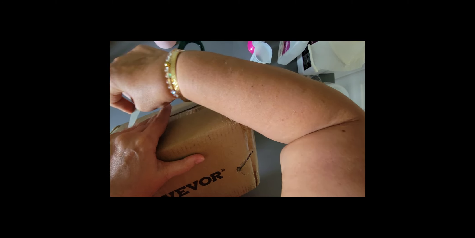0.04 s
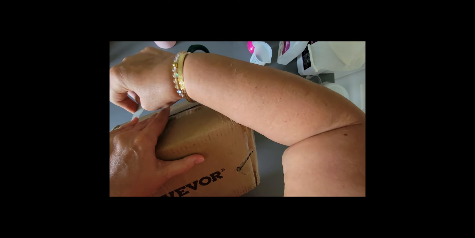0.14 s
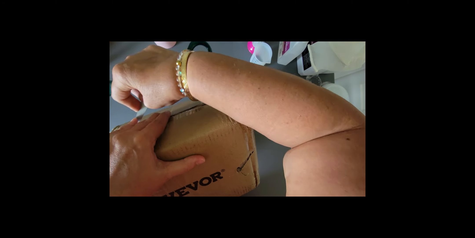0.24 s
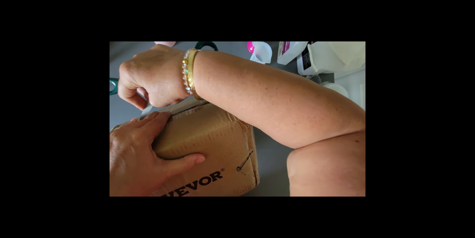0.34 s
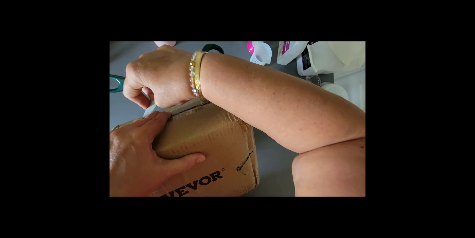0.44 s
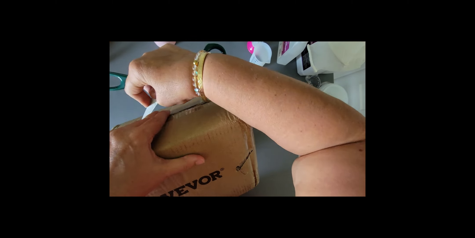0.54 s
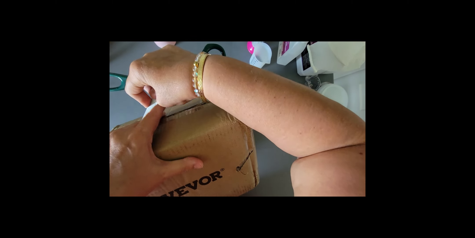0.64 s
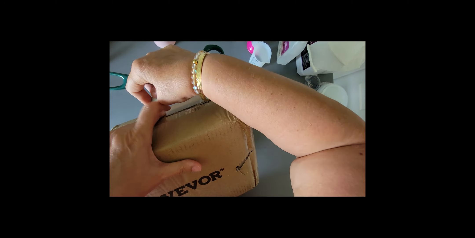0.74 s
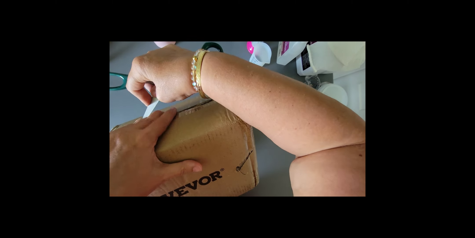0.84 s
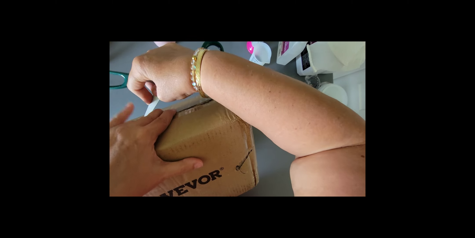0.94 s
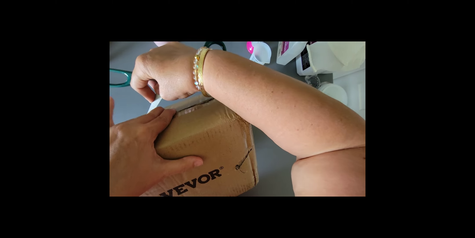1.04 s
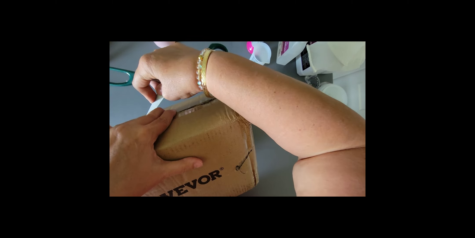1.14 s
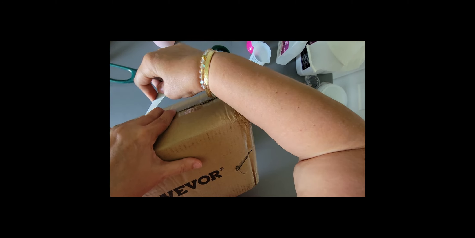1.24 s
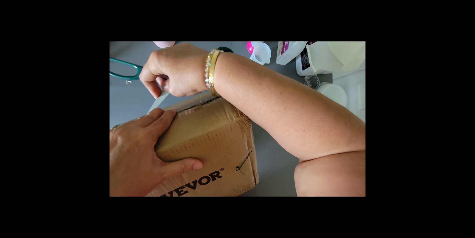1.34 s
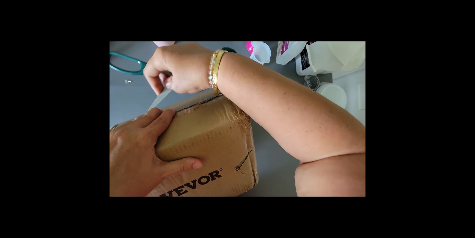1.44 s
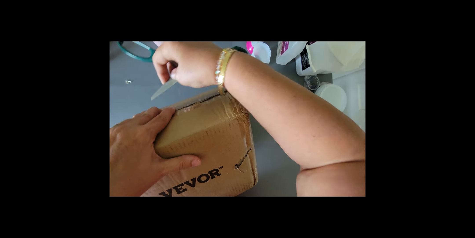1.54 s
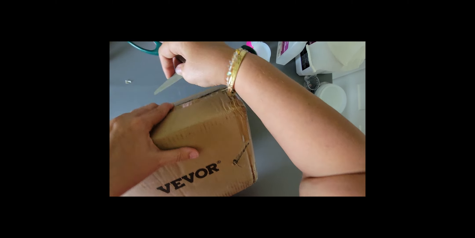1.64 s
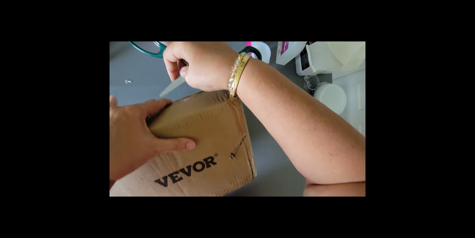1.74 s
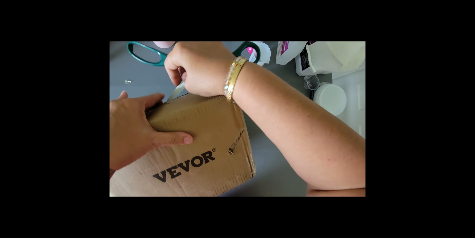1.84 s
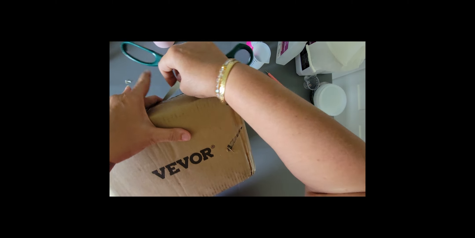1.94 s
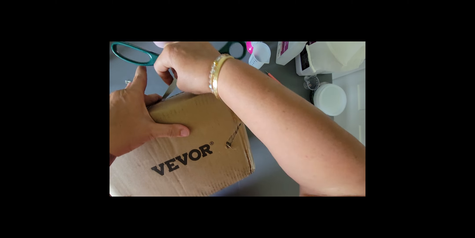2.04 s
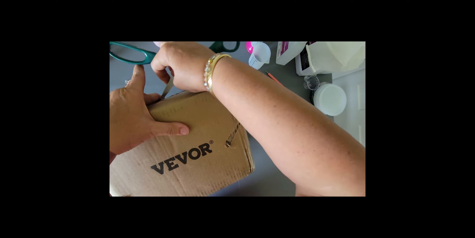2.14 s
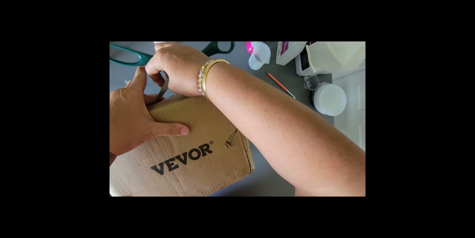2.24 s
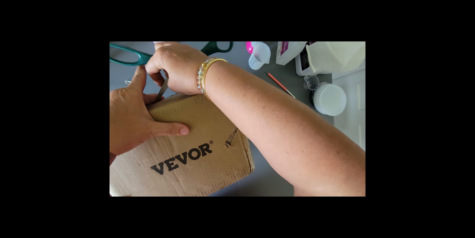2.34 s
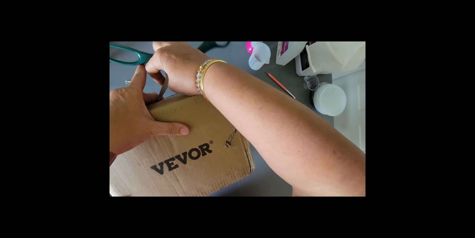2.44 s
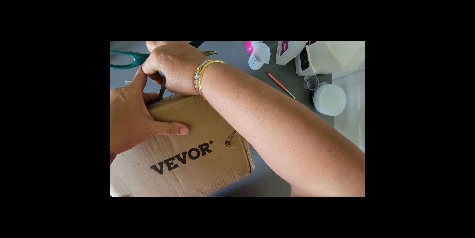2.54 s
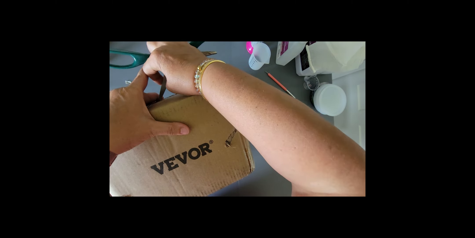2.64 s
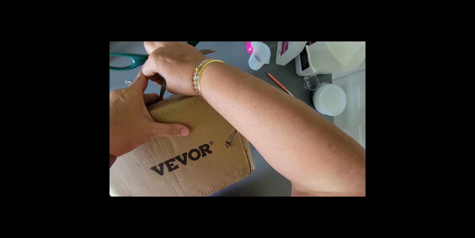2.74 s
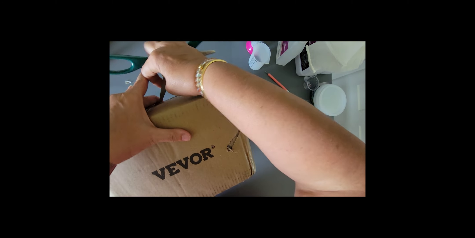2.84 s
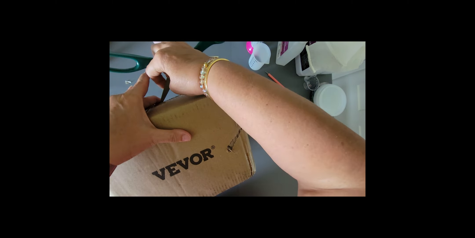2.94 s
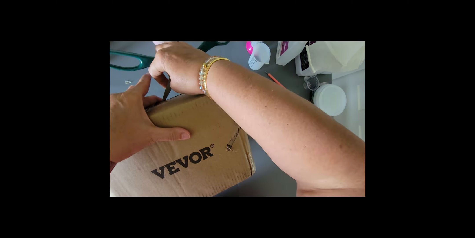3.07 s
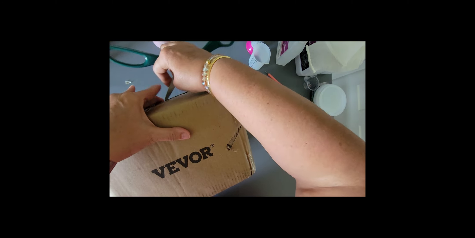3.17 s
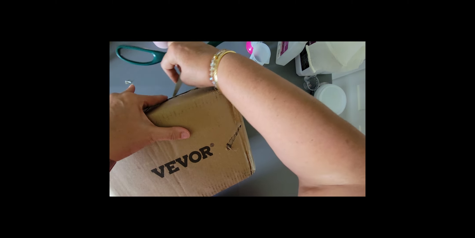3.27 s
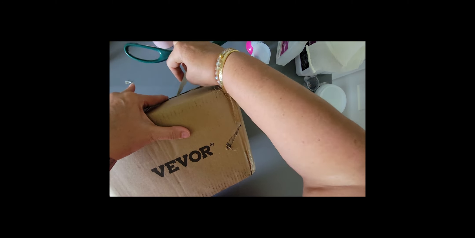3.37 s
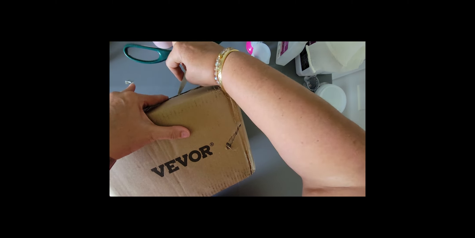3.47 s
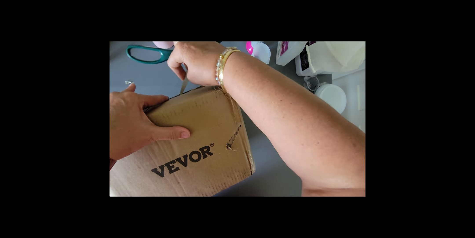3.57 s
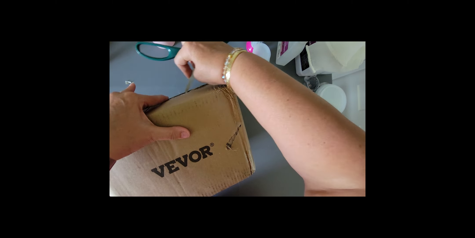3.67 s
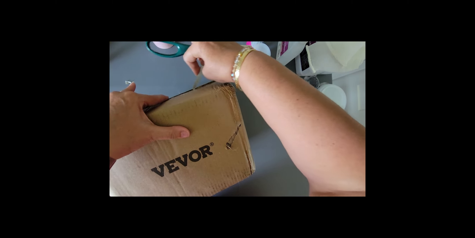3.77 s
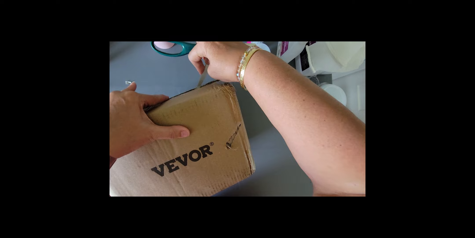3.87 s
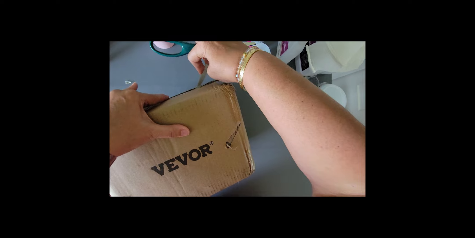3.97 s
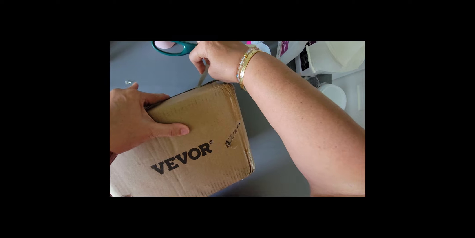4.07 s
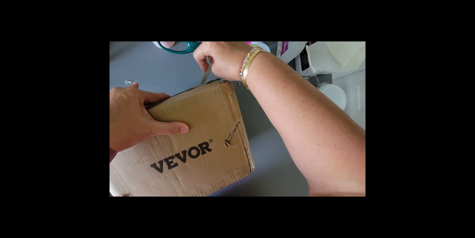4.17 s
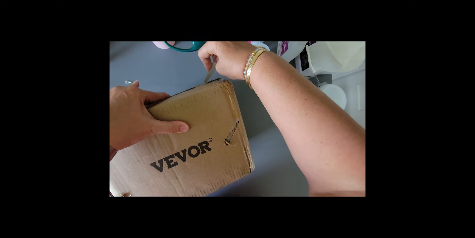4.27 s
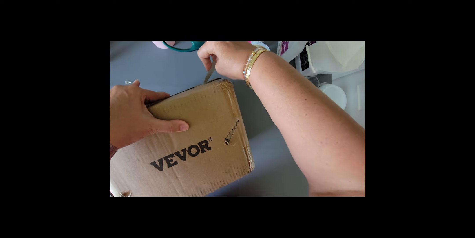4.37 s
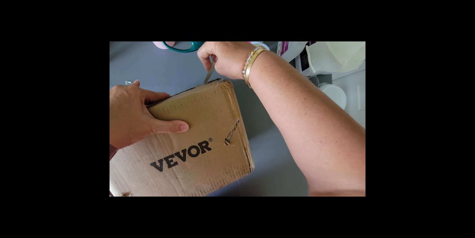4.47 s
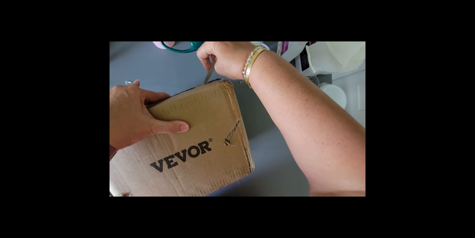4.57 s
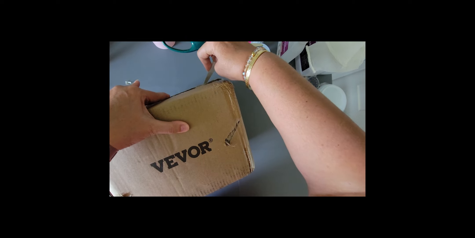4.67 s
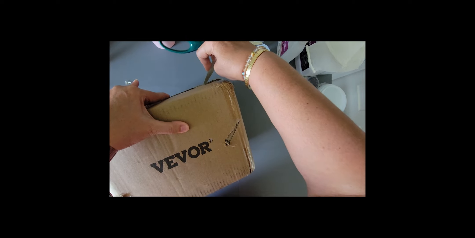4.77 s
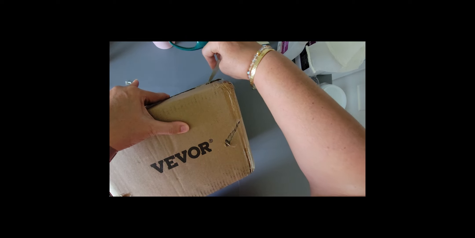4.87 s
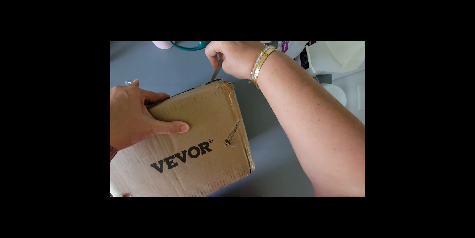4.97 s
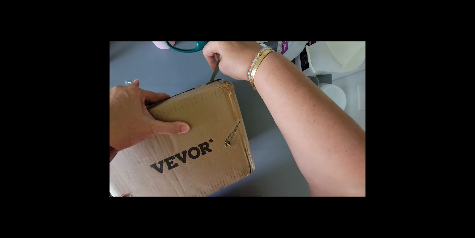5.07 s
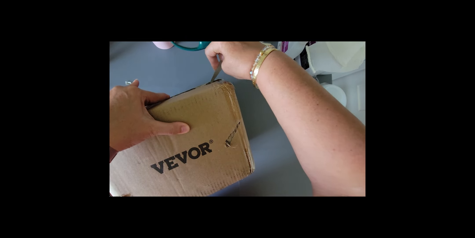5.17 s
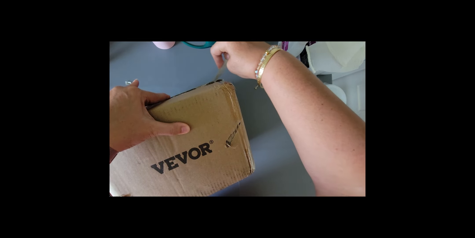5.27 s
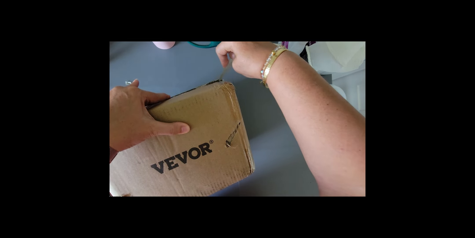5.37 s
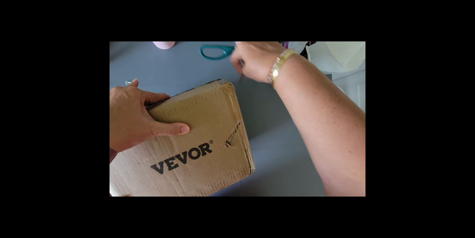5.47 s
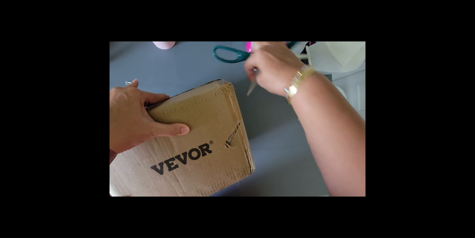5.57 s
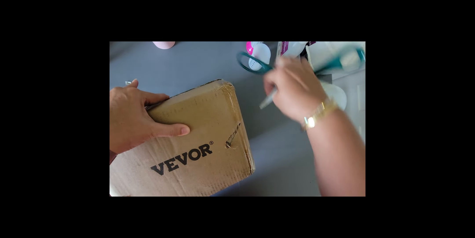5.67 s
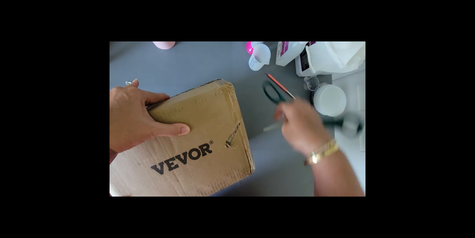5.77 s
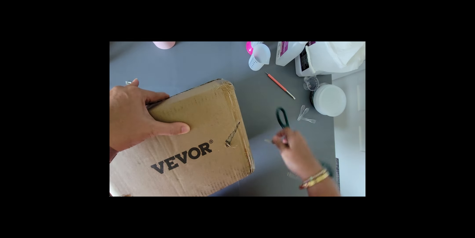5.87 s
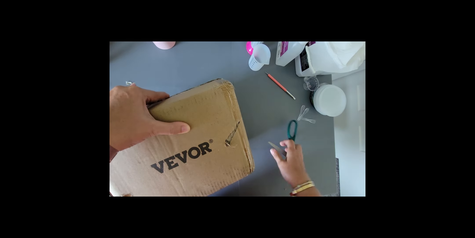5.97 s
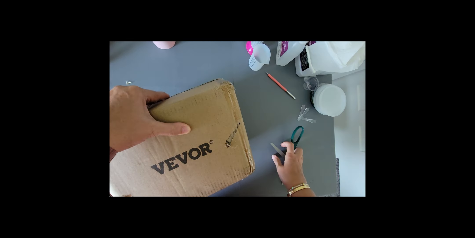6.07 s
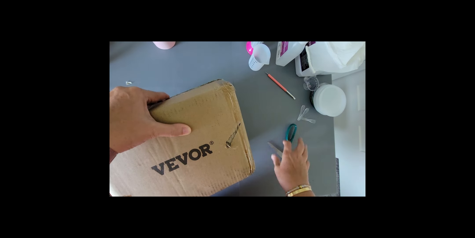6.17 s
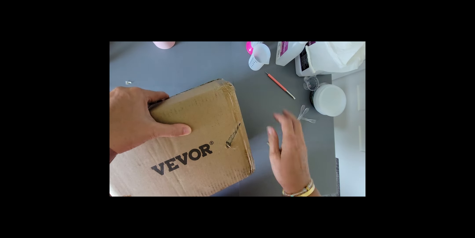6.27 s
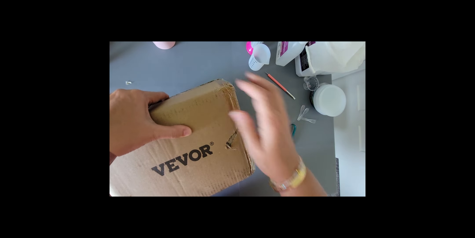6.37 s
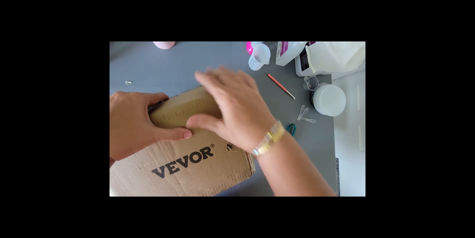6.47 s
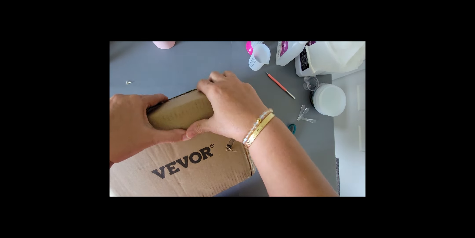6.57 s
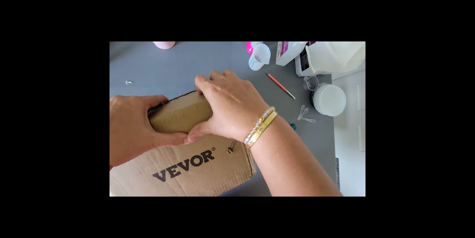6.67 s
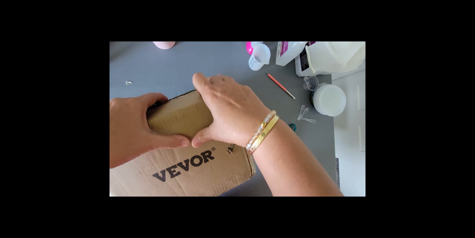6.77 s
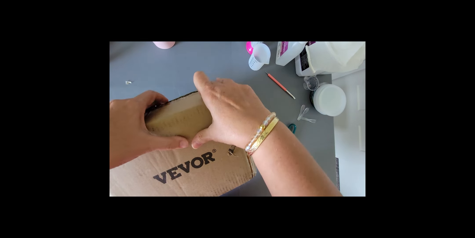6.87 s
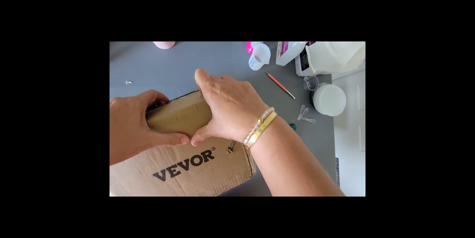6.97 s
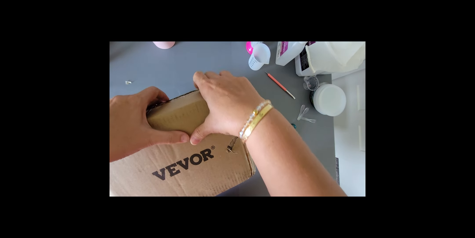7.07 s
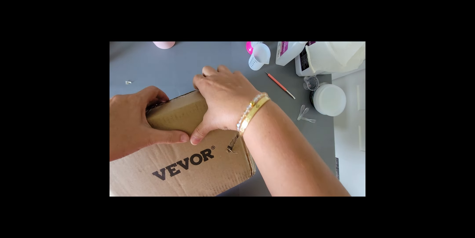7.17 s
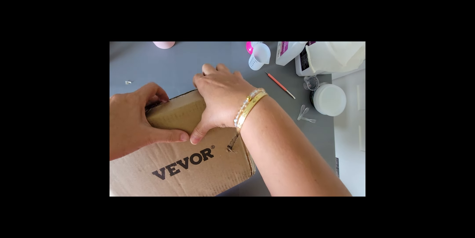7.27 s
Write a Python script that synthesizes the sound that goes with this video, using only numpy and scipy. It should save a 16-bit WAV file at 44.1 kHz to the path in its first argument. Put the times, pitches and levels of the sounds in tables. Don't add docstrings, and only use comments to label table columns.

```python
import sys
import numpy as np
from scipy import signal
from scipy.fft import rfft, irfft
from scipy.io import wavfile

SR = 44100
rng = np.random.default_rng(int(sys.argv[2]) if len(sys.argv) > 2 else 0)


def ratio(d):
    e = np.asarray(d, float) / 20
    return 10 ** e


def file_out(sig):
    cols = np.atleast_2d(sig).T
    lim = np.clip(cols, -1, 1)
    pcm = np.round(lim * 32767).astype(np.int16)
    wavfile.write(sys.argv[1], SR, pcm)


N = 322720

# f/Hz, level/dB
FLOOR_SPECTRUM = [(12, -27), (20, -14), (79, -4.5), (206, -20), (361, -13.5), (583, -24), (794, -25),
                  (1240, -32), (1840, -29), (2180, -35.5), (3620, -36.5), (7510, -48.5), (14300, -52),
                  (16500, -64)]
FLOOR_DB = -59
# f/Hz, t60/s
ROOM_DECAY = [(80, 0.3), (300, 0.31), (1200, 0.17), (4000, 0.31), (8000, 0.19), (15000, 0.29)]

# t/s, peak level/dB, table boom level/dB, blade clack level/dB, jingle level/dB
BOUNCES = [(6.0089, -49, -37.5, -67, -71), (6.0215, -36, -27, -52, -31.5), (6.0708, -15, -23, -28, -32),
           (6.0851, -38, -37, -42, -40.5), (6.094, -32, -26.5, -40, -31.5),
           (6.164, -11.5, -13.5, -18, -30.5), (6.17, -21, -26, -38, -37), (6.1776, -11, -18, -53, -27.5),
           (6.19, -26, -29, -49, -35.5), (6.2055, -33, -29, -51, -41.5), (6.2367, -31, -20, -42.5, -37),
           (6.258, -37, -32.5, -45, -49)]
# f/Hz, level/dB, t60/s
STEEL_MODES = [(1110, -1, .06), (1147, 0, .08), (1430, -2, .1), (1594, -4, .25), (1755, -3, .2),
               (1910, -2, .3), (2540, -5, .08), (2650, -2, .12), (4414, -12, .12), (5847, -11, .15),
               (7343, -11, .15), (8441, -13, .1), (12308, -13, .12), (12866, -11, .12)]
# f/Hz, level/dB, t60/s
TABLE_MODES = [(113, -9, 0.1), (170, -19, 0.09), (242, -2, 0.028), (304, 2, 0.029), (333.4, 4.5, 0.053),
               (480, -2.5, 0.028), (532, -10, 0.076), (670, -16.5, 0.1), (807, -8, 0.07)]
# f/Hz, level/dB
CLATTER_SPECTRUM = [(290, -8.5), (500, -4), (980, -1), (1120, 2.5), (1570, -1), (2220, -12.0), (2650, -7.5),
                    (4360, -12.5), (4830, -11), (8540, -12.5), (10600, -17), (13100, -9.5), (15800, -16),
                    (16500, -70)]
BOUNCE_DB_PER_S = 8000
CLACK_DB_PER_S, JINGLE_DB_PER_S = 202, 330

# t/s, peak level/dB, f/Hz
SEAM_TICKS = [(0.1615, -40, 3520), (0.1684, -42, 5790), (0.1919, -22, 3400), (0.2443, -39, 3510),
              (0.2907, -39, 2970), (0.3346, -39.5, 2660), (0.5367, -49, 2840), (0.6487, -55.5, 3390),
              (0.8293, -43.5, 3530), (0.9601, -48, 7000), (1.0444, -60, 4470), (1.1323, -56, 7870),
              (1.1794, -63, 4120), (1.1977, -48, 7840), (1.2321, -49, 6900), (1.3838, -59, 3400),
              (1.591, -52, 3560), (1.6442, -53, 3450), (1.7804, -48, 3530), (1.8402, -34, 3490),
              (1.9081, -56, 2620), (2.0648, -54, 3530), (2.4418, -54, 2610), (2.6978, -41, 3110),
              (2.9952, -47, 3750), (3.1512, -44.5, 3700), (3.1678, -39, 3290), (3.1774, -38, 3560),
              (3.2124, -22, 3600), (3.2454, -41, 3500), (3.2569, -32, 3080), (3.2714, -35, 2930),
              (3.2988, -34, 3000), (3.3288, -45, 2850), (3.3793, -58, 2910), (3.5359, -31, 2800),
              (3.6014, -52, 3880), (3.6362, -47, 2810), (3.6726, -39, 4140), (3.7429, -44, 4010),
              (3.7913, -24, 3240), (3.8312, -39, 2800), (4.1177, -49, 3910), (4.1507, -33, 2850),
              (4.2028, -39, 3680), (4.7547, -49, 2830), (4.7981, -33, 2750), (4.9462, -41, 2680),
              (5.017, -48, 3190), (5.1986, -47.5, 6000), (5.2722, -36, 2680), (5.2804, -36, 2720),
              (5.3439, -30, 2670), (5.4037, -20, 2800), (5.7882, -63, 3400)]
# t/s, peak level/dB, f/Hz
HAND_TICKS = [(6.4796, -43, 5760), (6.4871, -35, 2710), (6.7495, -44, 3780), (6.8029, -34.5, 2840),
              (6.8249, -50, 3700), (6.9111, -52, 3200), (6.9735, -41, 3960), (6.9825, -38, 4220),
              (7.0732, -46, 3910), (7.1885, -53, 2750), (7.2518, -45, 3910)]
# t/s, peak level/dB, f/Hz
FLUTE_TICKS = [(0.192, -38, 832), (0.329, -33, 711), (0.65, -46, 710), (0.828, -38.5, 695),
               (1.291, -56, 883), (1.649, -40, 818), (1.685, -32, 990), (1.774, -47, 711),
               (1.843, -42, 711), (1.887, -36, 980), (1.91, -31, 985), (2.008, -43, 1110),
               (2.064, -53, 719), (2.138, -50, 956), (2.156, -46, 931), (2.177, -44, 781),
               (2.241, -32, 794), (2.3, -48, 713), (2.414, -55, 703), (2.697, -44, 705), (3.167, -39, 990),
               (3.213, -32, 720), (3.298, -34, 700), (3.535, -44, 1130), (3.554, -33, 1140),
               (3.603, -47, 1120), (3.638, -42, 856), (3.672, -42, 703), (3.735, -42, 791),
               (3.792, -25.5, 1010), (3.831, -29, 794), (4.15, -29, 988), (4.202, -22, 703),
               (4.798, -46, 703), (4.945, -40, 703), (5.274, -39, 711), (5.344, -35, 970),
               (5.411, -28, 850), (5.434, -24, 1000), (6.485, -31, 1230), (6.664, -52, 703),
               (6.71, -46, 705), (6.736, -43, 921), (6.803, -44, 1500)]
# t/s, peak level/dB, f/Hz
PINGS = [
    (3.2125, -32, 3600),
    (3.299, -38, 3240),
    (3.536, -38, 2800),
    (4.151, -38, 2850),
    (4.799, -37, 2750),
    (4.8493, -44, 2800),
    (4.9465, -41, 2680),
    (5.2735, -39, 2700),
    (5.3445, -38, 2670),
    (5.4045, -27, 2800),
]
TAPE_TICK_T60_S, CARD_TICK_T60_S, BLADE_T60_S = .0055, .013, .03
TICK_DELAY_S = .0008

# f/Hz, width/Hz, level/dB
PANEL_MODES = [(112, 42, -1.5), (150, 37, -13), (210, 89, 10), (295, 83, -13), (330.4, 31, 10),
               (502, 55, -4.5)]
# f/Hz, level/dB
RASP_SPECTRUM = [(240, -27), (400, 3), (472, -7), (515, 7), (651, -12.5), (704, 1.5), (891, -7.5), (980, 1),
                 (2570, -15), (3200, -23), (4160, -84), (7040, -120)]
# f/Hz, level/dB
HISS_SPECTRUM = [(1180, -51.5), (2000, -15.5), (2800, -1.5), (8820, -7), (10900, -13.5), (14200, -11),
                 (16100, -47), (16500, -82.5)]
# t/s, hold/s, panel rumble level/dB, card rasp level/dB, tape hiss level/dB
CORNER_RUBS = [(0.0, 0.014, -34, -37.5, -46.5), (0.205, 0.098, -43, -45.5, -52),
               (0.446, 0.065, -59, -66, -70), (0.573, 0.13, -56.5, -63, -66.5), (.72, 0.092, -64, -72, -73),
               (0.946, 0.018, -58, -56.5, -65), (1.03, 0.31, -68.5, -70, -68.5),
               (1.377, 0.073, -68.5, -88, -71.5), (1.553, 0.35, -57, -60, -71.5),
               (1.875, .19, -59.5, -53.5, -69), (2.123, 0.077, -48, -53, -70.5),
               (2.22, 0.14, -58, -62, -71), (2.434, 0.029, -39.5, -40, -64),
               (2.659, 0.081, -51.5, -59.5, -70), (2.772, .26, -56.5, -59, -72.5)]
# t/s, hold/s, rumble level/dB, rasp level/dB, hiss level/dB
SEAM_STROKES = [(3.158, 0.12, -45, -40.5, -49.5), (3.33, 0.046, -49, -52, -78),
                (3.548, 0.042, -54, -56, -65), (3.645, 0.094, -32, -42.5, -54),
                (4.111, 0.016, -51, -53, -58), (4.774, 0.072, -52, -58, -60),
                (5.018, 0.0099, -45, -63, -60), (5.247, 0.033, -42, -58, -56.5),
                (5.31, 0.16, -44, -61, -57), (6.482, 0.022, -62, -45, -51), (6.542, 0.081, -60, -66, -63),
                (6.657, 0.058, -43.5, -49.5, -55), (6.76, 0.095, -78, -76, -69),
                (6.878, 0.015, -73, -81, -71), (6.977, 0.0059, -61, -44, -53), (7.034, 0.12, -76, -75, -68),
                (7.252, .07, -53, -58.5, -66)]
PRESS_DB_PER_S, LIFT_DB_PER_S = 457, 341
JOLT_DB_PER_S = 2600
AFTER_THUMP, AFTER_KNOCK, AFTER_SNAP = (-8.5, 215), (-8, 220), (-11, 820)

# f/Hz, level/dB
SNAP_SPECTRUM = [(1000, -14.5), (2000, -9), (3500, -9.5), (6000, -7.5), (10000, -19.5), (15500, -17),
                 (16500, -53)]
# t/s, snap peak level/dB, card knock level/dB, hollow thump level/dB, thump f/Hz
CORNER_PICKS = [(0.163, -32, -51, -68, 204), (0.194, -31, -49, -47, 344), (0.2922, -49, -46, -64, 117),
                (0.335, -31.5, -37, -46, 163), (0.535, -51, -52.5, -71, 133), (0.5603, -53, -57, -59, 213),
                (0.648, -39, -48, -60, 99), (0.828, -38.5, -36.5, -29.5, 135), (0.96, -48, -46, -44, 152),
                (1.133, -62, -90, -85, 150), (1.199, -63, -67.5, -82, 181),
                (1.2321, -50.5, -76.5, -83, 102)]
FLAP_PRIES = [(1.5334, -58, -52, -53.5, 371), (1.5912, -48.5, -53, -48, 322),
              (1.646, -46.5, -44.5, -46, 100), (1.6849, -63, -45, -57, 350), (1.7769, -41, -49, -45.5, 170),
              (1.843, -42.5, -31, -31, 153), (1.8878, -61, -39, -56, 123), (1.9082, -44.5, -40.5, -62, 340),
              (2.0638, -58, -66, -54, 104), (2.157, -75, -48, -42.5, 369), (2.1812, -51, -45, -54, 354),
              (2.2392, -52, -44, -51, 340), (2.37, -50, -75, -67, 150), (2.4157, -64, -58, -57, 142),
              (2.695, -29, -34, -39, 365), (2.9173, -55, -55, -51.5, 148), (2.996, -43, -47.5, -47, 154)]
SEAM_CUTS = [(3.1515, -41, -59, -48, 103), (3.168, -35.5, -34, -42, 158), (3.1882, -31, -31.5, -34, 165),
             (3.212, -27, -25.5, -31.5, 109), (3.269, -55, -37, -32.5, 349), (3.2983, -32, -36, -26.5, 166),
             (3.39, -47, -51, -40, 161), (3.523, -50, -68, -56, 146), (3.5359, -36, -39, -40.5, 132),
             (3.6037, -40.5, -38, -53, 103), (3.6354, -52, -46, -36, 148), (3.6734, -35.5, -42, -32, 153),
             (3.744, -40, -51, -42, 109), (3.7923, -21.5, -27, -29.5, 210), (3.8315, -33, -26, -39, 99)]
FAR_JABS = [(4.0887, -62, -58, -61, 274), (4.119, -40, -50, -61, 340), (4.15, -19, -29, -25.5, 179),
            (4.2036, -25, -31, -19, 190), (4.7546, -46.5, -58.5, -61, 118),
            (4.7973, -34.5, -37.5, -28.5, 209), (4.8493, -41.5, -40.5, -43, 115),
            (4.9444, -38.5, -38.5, -34, 134), (5.0128, -43, -42, -45, 300), (5.2021, -40.5, -58, -71, 122),
            (5.2555, -52, -49, -45, 278), (5.2732, -28, -39, -29.5, 202), (5.343, -46, -34, -44, 264),
            (5.404, -21, -27, -28.5, 147), (5.437, -28, -43, -48, 166)]
HAND_GRIPS = [(6.4864, -39.5, -34, -37, 247), (6.4962, -36, -66.5, -30, 88), (6.7346, -46.5, -45, -33, 210),
              (6.7504, -54, -65, -51, 187), (6.8055, -39.5, -44.5, -48, 320), (6.8402, -45, -67, -42, 89),
              (6.9108, -49, -72, -76, 80.5), (6.9578, -62, -63, -53, 266), (6.983, -31, -55, -47.5, 284),
              (7.0723, -49, -64, -69, 85), (7.138, -56, -91, -69, 120), (7.188, -47.5, -80, -59.5, 107),
              (7.2514, -49, -42, -48, 146), (7.3094, -49, -38, -37, 324)]
BLOWS = CORNER_PICKS + FLAP_PRIES + SEAM_CUTS + FAR_JABS + HAND_GRIPS

NEAR_LAG, FAR_LAG, TABLE_LAG = 13, 21, 22
SNAP_PAN_DB = 3.5
SNAP_BOUNCE, TAPE_BOUNCE = .6, .8


def rms_one(x):
    return x / np.sqrt(np.mean(x ** 2) + 1e-20)


def colour(x, points):
    hz = np.maximum(np.arange(2049) * SR / 4096, 1)
    point_hz, point_db = np.transpose(points)
    log_gain = np.log(ratio(np.interp(np.log(hz), np.log(point_hz), point_db)))
    cepstrum = irfft(log_gain)[:2049] * np.r_[1, 2 * np.ones(2047), 1]
    response = irfft(np.exp(rfft(cepstrum, 4096)))
    rows = [signal.oaconvolve(row, response)[:N] for row in np.atleast_2d(x)]
    return np.array(rows).reshape(x.shape)


def band(x, low_hz, high_hz):
    return signal.sosfilt(signal.butter(2, [low_hz, high_hz], "band", fs=SR, output="sos"), x)


def ring(clicks, hz, t60):
    r, w = ratio(-60 / (t60 * SR)), 2 * np.pi * hz / SR
    return signal.lfilter([0, np.sin(w)], [1, -2 * r * np.cos(w), r * r], clicks + 1e-18)


def grains(per_s, spread_db, clump_db):
    clumps = rms_one(band(rng.standard_normal(N), 3.2, 103.0))
    size_db = spread_db * np.minimum(rng.exponential(1, N), 4) + clump_db * clumps
    sizes = ratio(size_db) * rng.choice([-1, 1], N)
    return rms_one(sizes * (rng.random(N) < per_s / SR))


def bursts(times, levels_db, t60, rise):
    clicks = np.zeros(N)
    clicks[(np.array(times) * SR).astype(int)] = ratio(np.array(levels_db))
    dying = signal.lfilter([1], [1, -ratio(-60 / (t60 * SR))], clicks + 1e-18)
    slow = np.exp(-1 / (rise * SR))
    return signal.lfilter([1 - slow], [1, -slow], dying) * rng.standard_normal(N)


def swells(start, hold, level_db, swell_per_s, fade_per_s):
    t, out = np.arange(0, N + 16, 16) / SR, 0
    for s, length, db in np.broadcast(start, hold, level_db):
        before, after = np.maximum(s - t, 0), np.maximum(t - s - length, 0)
        out = out + ratio(db - swell_per_s * before - fade_per_s * after)
    return np.interp(np.arange(N) / SR, t, out)


def ports(x, lag, pan_db):
    left, right = np.roll(x, max(-lag, 0)), np.roll(x, max(lag, 0))
    return np.array([ratio(pan_db / 2) * left, ratio(-pan_db / 2) * right])


def scattered(pair, lag, pan_db, share):
    bounced = pair[1] * ratio(np.array([[pan_db], [-pan_db]]) / 2) * [[1], [-1]]
    return ports(pair[0], lag, pan_db) + share * bounced


def floor():
    shared, own = rng.standard_normal(N), rng.standard_normal((2, N))
    air = band(shared, 12, 170) + 0.91 * band(own, 13, 170) + band(own, 250, 22000)
    hum = ratio(-7.5) * rms_one(ring(rng.standard_normal(N), 48.0, t60=0.91))
    return ratio(FLOOR_DB - 1.5) * (rms_one(colour(air, FLOOR_SPECTRUM)) + hum)


def room(x):
    t, tail = np.arange(round(.6 * SR)) / SR, 0
    shared, own = rng.standard_normal(len(t)), rng.standard_normal((2, len(t)))
    for hz, t60 in ROOM_DECAY:
        alike = np.clip(1.15 - hz / 1200, 0, 1)
        echoes = alike * shared + np.sqrt(1 - alike ** 2) * own
        edges = hz / 2, min(hz * np.sqrt(3), .45 * SR)
        tail = tail + band(band(echoes, *edges), *edges) * ratio(-60 * t / t60)
    tail = tail * np.clip((t - .003) / 0.00057, 0, 1)
    tail = tail * ratio(-20 * (t / 0.33) ** 2)
    return signal.fftconvolve(x[None], tail / np.sqrt(np.sum(tail ** 2) / 2), axes=1)[:, :N]


def struck(modes, at, blow_db):
    out = np.zeros(N)
    for hz, db, t60 in modes:
        clicks = np.zeros(N)
        clicks[at] = ratio(blow_db + db + rng.normal(0, 2.4, len(at))) * rng.choice([-1, 1], len(at))
        out += ring(clicks, hz, t60)
    return out


def scissors():
    s, peak_db, boom_db, clack_db, jingle_db = np.transpose(BOUNCES)
    at = (s * SR).astype(int)
    out = colour(bursts(s, peak_db + 3.5, t60=0.027, rise=0.00017), CLATTER_SPECTRUM)
    out = out + struck(STEEL_MODES, at, peak_db - 24) + struck(TABLE_MODES, at, boom_db - 5.5)
    clack = swells(s, 0, clack_db, BOUNCE_DB_PER_S, CLACK_DB_PER_S)
    jingle = swells(s, 0, jingle_db, BOUNCE_DB_PER_S, JINGLE_DB_PER_S)
    chatter = colour(grains(2500.0, spread_db=1.0, clump_db=2.0), CLATTER_SPECTRUM)
    out = out + ratio(-4.0) * clack * rms_one(band(chatter, 460, 4440))
    out = out + ratio(-1.0) * jingle * rms_one(band(chatter, 3150, 13500))
    other = np.roll(chatter, N // 2)
    other_blade = ratio(-3.0) * jingle * rms_one(band(other, 2730, 14000))
    other_blade = other_blade + ratio(-5.5) * clack * rms_one(band(other, 560, 3800))
    return scattered([out, other_blade], -TABLE_LAG, -3.0, 0.79)


def ticks(rows, t60, grit):
    out, t = np.zeros((2, N + 1000)), np.arange(1000) / SR
    noise = rng.standard_normal((len(rows), 2, len(t)))
    for (s, db, hz), spit in zip(rows, noise):
        spit = band(spit * ratio(-120 * t / t60), hz / 2, min(2 * hz, .45 * SR))
        onset = 2 * (1 - np.exp(-t * hz / 2))
        ping = np.sin(2 * np.pi * hz * t) * ratio(-60 * t / t60) * onset
        i = round((s + TICK_DELAY_S) * SR)
        out[:, i:i + len(t)] += ratio(db) * (ping * [[1], [0.3]] + grit * spit)
    return out[:, :N]


def ticking():
    tape = ratio(-4.0) * ticks(SEAM_TICKS + HAND_TICKS, TAPE_TICK_T60_S, grit=1.35)
    blade = ratio(-5.0) * ticks(PINGS, BLADE_T60_S, grit=0.2)
    card = ratio(-1.0) * ticks(FLUTE_TICKS, CARD_TICK_T60_S, grit=1.0)
    seam = scattered(tape + blade, FAR_LAG, SNAP_PAN_DB, SNAP_BOUNCE)
    return seam + scattered(card, NEAR_LAG, 3.3, 0.4)


def friction():
    start, hold, *rub_db = np.transpose(CORNER_RUBS + SEAM_STROKES)
    s, snap_db, knock_db, thump_db, _ = np.transpose(BLOWS)
    after = zip(rub_db, (thump_db, knock_db, snap_db), (AFTER_THUMP, AFTER_KNOCK, AFTER_SNAP))
    gains = []
    for db, blow_db, (below_db, fade) in after:
        rubbing = swells(start, hold, db, PRESS_DB_PER_S, LIFT_DB_PER_S)
        slipping = swells(s, 0, blow_db + below_db, JOLT_DB_PER_S, fade)
        gains.append(rubbing + slipping)
    return gains


def crackle(per_s, low_hz, high_hz, cycles):
    breaks, dealt = grains(per_s, spread_db=3.5, clump_db=2.5), rng.integers(0, 7, N)
    pitches = np.geomspace(low_hz, high_hz, 7)
    return rms_one(sum(ring(breaks * (dealt == k), hz, cycles / hz) for k, hz in enumerate(pitches)))


def drag():
    rumble, rasp, hiss = friction()
    rumble = np.minimum(rumble, ratio(-39.0))
    rasp = np.minimum(rasp, ratio(-32))
    coarse = grains(500.0, spread_db=1.5, clump_db=3.5)
    fine = np.array([grains(3000.0, spread_db=1.5, clump_db=1.0) for path in range(2)])
    panels = sum(ratio(db) * np.sqrt(width) * ring(coarse, hz, 1.78 / width) for hz, width, db in PANEL_MODES)
    card = rasp * rms_one(colour(0.59 * coarse * [[1], [0]] + 0.72 * fine, RASP_SPECTRUM))
    tape = hiss * rms_one(colour(fine[::-1] + 0.14 * coarse, HISS_SPECTRUM))
    fibres = ratio(-13.0) * rasp * crackle(500.0, 607, 1970, cycles=19.0)
    fibres = fibres + ratio(-6.5) * hiss * crackle(900.0, 1600, 8200, cycles=10.6)
    body = ports(ratio(-7) * rumble * rms_one(panels) + fibres, NEAR_LAG, 1.7)
    body = body + ratio(-15.0) * scattered(card, NEAR_LAG, 2.6, 1.0)
    return body + ratio(-13.5) * scattered(tape, FAR_LAG, 14.1, TAPE_BOUNCE)


def blows():
    s, snap_db, knock_db, thump_db, thump_hz = np.transpose(BLOWS)
    crack = bursts(s, snap_db + 4.5, t60=0.0092, rise=0.00036)
    bounced = bursts(s, snap_db + 9.5, t60=0.012, rise=0.00077)
    snaps = colour(np.array([crack, bounced]), SNAP_SPECTRUM)
    body = colour(bursts(s, knock_db + 17.0, t60=0.017, rise=0.00037), RASP_SPECTRUM)
    t = np.arange(round(.15 * SR)) / SR
    sagging = t + 0.00075 * (1 - np.exp(-t / 0.002))
    cavity = 0.6 * np.sin(2 * np.pi * 108 * t) * ratio(-60 * t / 0.038)
    lid = 0.07 * np.sin(2 * np.pi * 360 * t) * ratio(-60 * t / 0.16)
    onset = 1 - np.exp(-t / 0.0026)
    for start, db, hz in zip(s, thump_db, thump_hz):
        push = np.sin(2 * np.pi * hz * sagging) * ratio(-60 * t / 0.041)
        thump = onset * ratio(db + 10.5) * (push + cavity + lid)
        i = round((start + 0.0023) * SR)
        body[i:i + len(t)] += thump[:N - i]
    return scattered(snaps, FAR_LAG, SNAP_PAN_DB, SNAP_BOUNCE) + ports(body, NEAR_LAG, 3.2)


def scene():
    box, tick, drop = blows() + drag(), ticking(), scissors()
    far = ratio(-7.5) * box[0] + ratio(-11.0) * tick[0] + ratio(-5.0) * drop[1]
    far = far - 0.27 * band(far, 50, 490)
    near = box + tick + drop + room(far)
    return signal.sosfilt(signal.butter(4, 62, "high", fs=SR, output="sos"), near) + floor()


def top_cut(x):
    return signal.sosfilt(signal.butter(12, 16990, fs=SR, output="sos"), x)


def record(dry):
    return top_cut(dry)


dry = scene()
out = record(dry)
file_out(out)
```